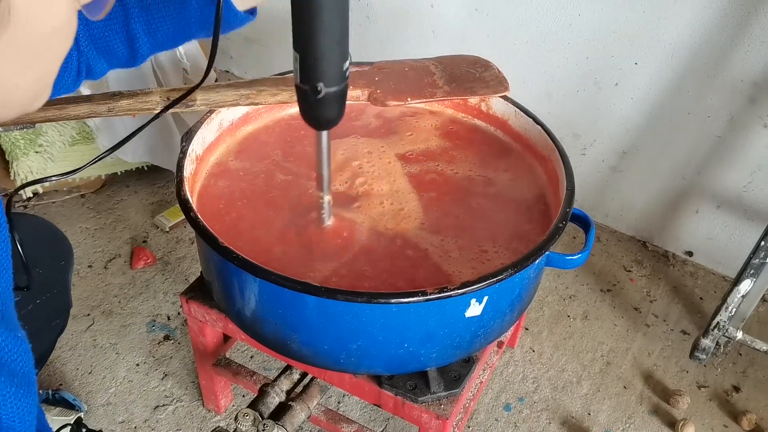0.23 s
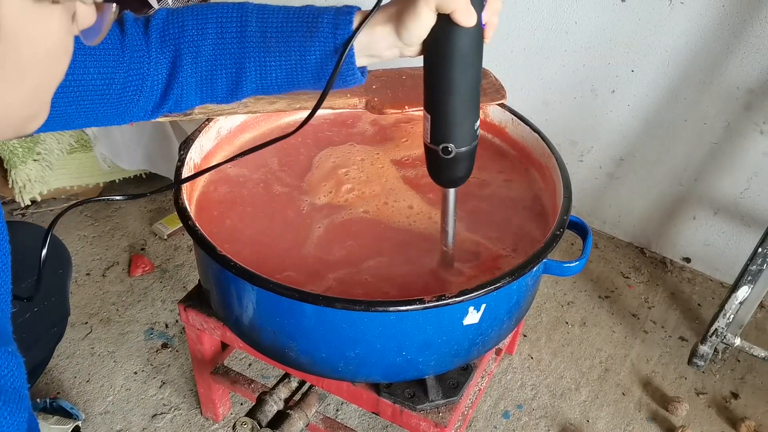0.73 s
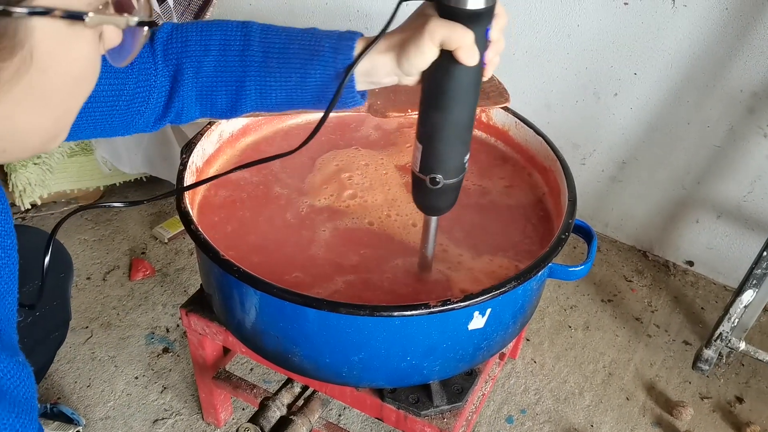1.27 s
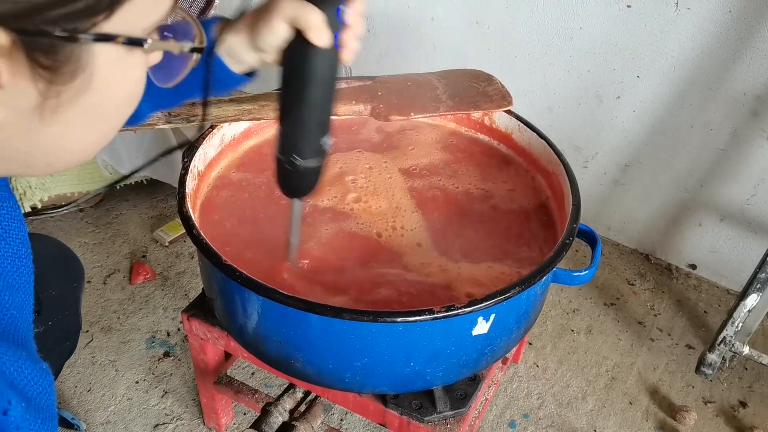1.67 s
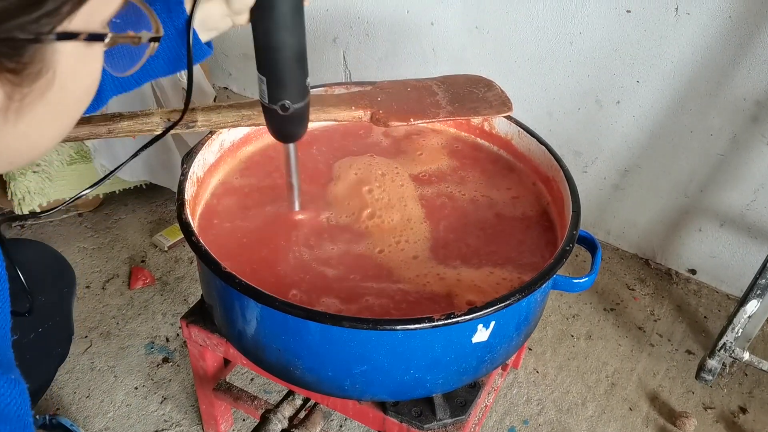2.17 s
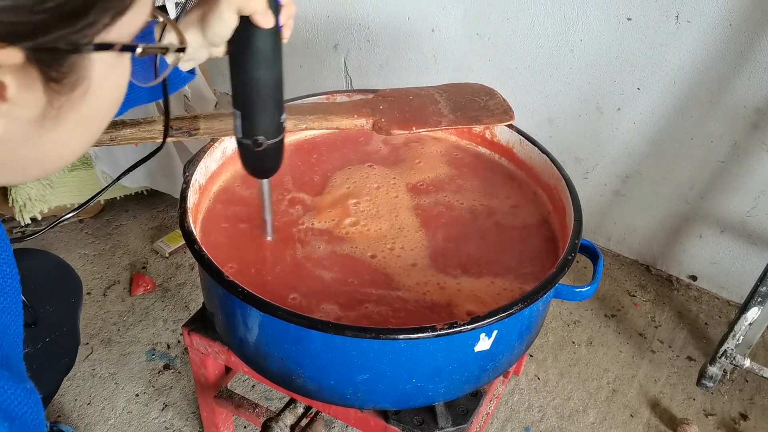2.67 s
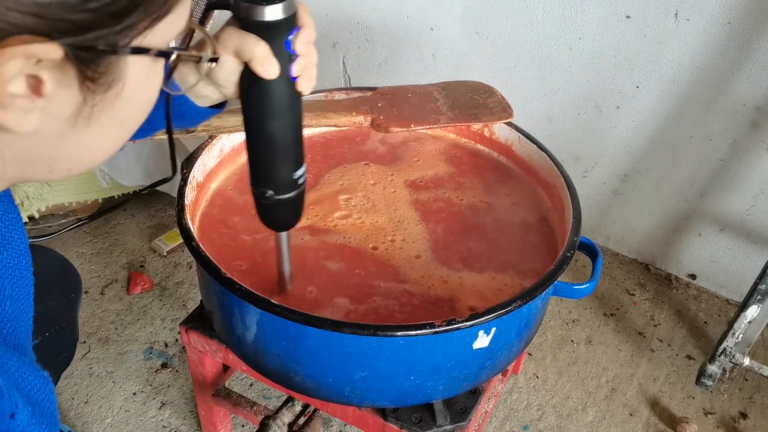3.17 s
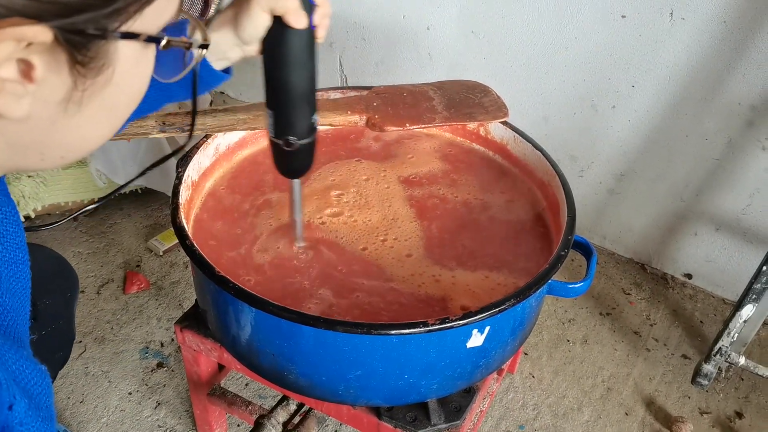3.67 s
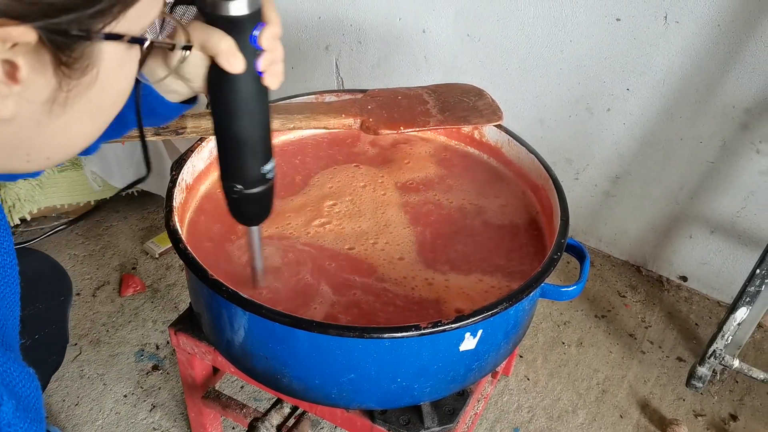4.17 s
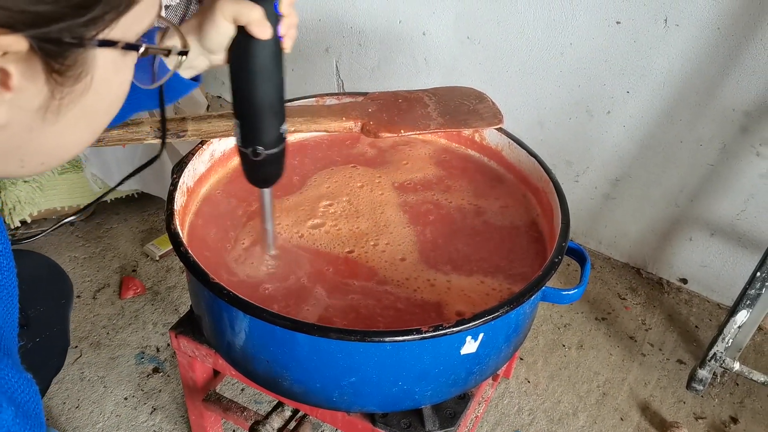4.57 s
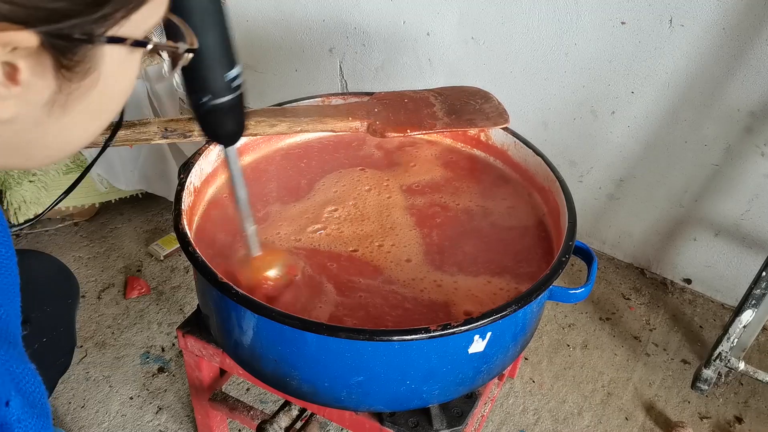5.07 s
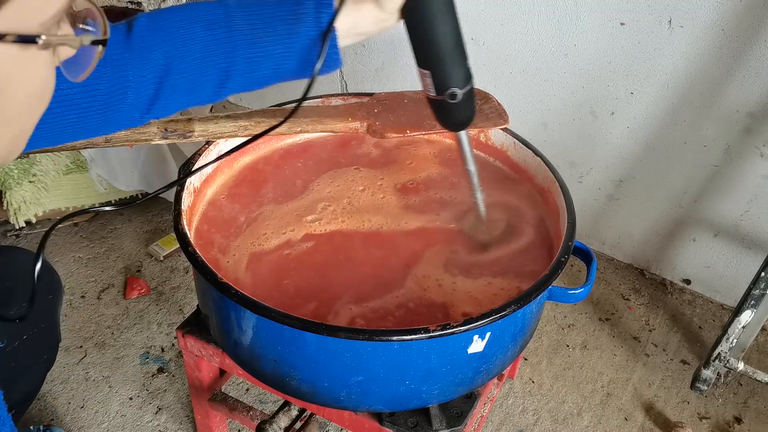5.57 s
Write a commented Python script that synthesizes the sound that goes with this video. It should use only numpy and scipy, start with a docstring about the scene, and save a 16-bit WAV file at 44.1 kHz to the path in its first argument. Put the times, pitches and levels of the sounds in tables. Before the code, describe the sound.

A stick blender purees tomatoes in a big pot in bursts, humming, whining and fizzing, winding down between them.

```python
"""A stick blender winds down, then purees tomatoes in a big enamel pot in three bursts, coasting between.
Its two-winged blade hums in the pulp, then sucks in air and turns to a harsh, fizzing buzz.
The commutator whines, the brushes hiss, the pulp churns and slops, and drops fall off the lifted blade.
A quiet room rumbles behind."""
import sys
import numpy as np
from scipy import signal
from scipy.fft import rfft, irfft, next_fast_len
from scipy.io import wavfile
from scipy.ndimage import uniform_filter1d, map_coordinates

SR = 44100
rng = np.random.default_rng(int(sys.argv[2]) if len(sys.argv) > 2 else 0)


def digitize_waveform(pressure):
    """Quantize a signal to 16-bit integers and store it at the path in sys.argv[1].

    Rows of a 2-D input are taken as channels; values are limited to [-1, 1].
    """
    field = np.atleast_2d(pressure).T
    bounded = np.clip(field, -1, 1)
    quanta = np.round(bounded * 32767).astype(np.int16)
    wavfile.write(sys.argv[1], SR, quanta)


N = 256220
T = np.arange(N) / SR
FFT_SIZE = next_fast_len(N + 8192)
FFT_HZ = np.fft.rfftfreq(FFT_SIZE, 1 / SR)

# Blade's push on the pulp, a list per burst. Each row: time in seconds, tone gain in dB, octave gain in dB.
PULP_PUSH = [
    [(0.69, -17, -43), (0.722, -17, -33), (1.042, -23, -27), (1.088, -32, -24), (1.154, -22, -32),
     (1.2, -27, -26)],
    [(2.11, -21, -23), (2.23, -22, -27), (2.26, -15, -24), (2.38, -12, -16), (2.48, -19, -28),
     (2.63, -23, -15), (2.82, -18, -31), (2.93, -24, -18), (3.02, -21, -20), (3.11, -18, -40),
     (3.16, -19, -25), (3.2, -24, -32), (3.29, -30, -18), (3.4, -33, -29), (3.55, -21, -31),
     (3.65, -35, -27), (3.71, -18, -30), (3.79, -17, -19), (3.97, -20, -28), (4.01, -24, -20),
     (4.14, -23, -30), (4.35, -28, -24), (4.42, -26, -29), (4.62, -16, -18)],
    [(5.69, -47, -47), (5.742, -38, -53), (5.8, -26, -41)],
]
# Air drawn in, a list per vortex. Each row: time in seconds, buzz gain in dB, spray gain in dB.
AIR_INTAKE = [
    [(1.012, -24, -25), (1.036, -25, -19), (1.2, -20, -19)],
    [(2.27, -30, -25), (2.35, -24, -26), (2.46, -21, -22), (2.85, -31, -27), (2.88, -26, -25),
     (3.08, -26, -24), (3.15, -30, -28), (3.3, -26, -21), (3.49, -27, -26), (3.68, -26, -21),
     (3.91, -28, -26), (4.41, -26, -24), (4.48, -28, -21), (4.63, -28, -26)],
]
# Blade overtones. Each row: multiple of the shaft speed, relative level in dB.
BLADE_OVERTONES = [(1, -12.5), (3, -15), (5, -17), (6, 0), (7, -11), (8, -.8), (10, -.4), (12, -6),
                   (14, -8), (16, -4.5), (18, -3.5), (20, -11), (22, -12), (26, -11), (32, -6)]

def blade(angle, speed_hz, pace, power, boom_hz=310, boom_width_hz=28, boom_db=6):
    """Two wings pass per turn: a round hum in the pulp, a stack of overtones once they beat on air."""
    slip = 3.2 * power  # during run-up the blade has not yet gripped the pulp
    tone, octave = amp(burst_curves_db(PULP_PUSH)) * pace ** (5.2 + slip)
    funnel = vortex(rise_s=.03)
    buzz = amp(burst_curves_db(AIR_INTAKE)[0]) * funnel * pace ** 6.8
    pot_resonance = amp(boom_db / (1 + ((2 * speed_hz - boom_hz) / boom_width_hz) ** 2))
    # the vortex sways, gulps while it opens, and breaks up at power-off
    sway_rad = .055
    gulp_rad = .2 * np.sin(np.pi * vortex(rise_s=.035))
    breakup_rad = .8 * (1 - uniform_filter1d(power, size=2000))
    angle = angle + (sway_rad + gulp_rad + breakup_rad) * wobble(70)
    tone_wave = partial(angle, order=2, rough=.12, drift_rad=.26, swell_db=1.9, drift_hz=40)
    octave_wave = partial(angle, order=4, rough=.12, drift_rad=.25, swell_db=2.1, drift_hz=28)
    hum = amp(.4) * pot_resonance * tone * tone_wave + amp(1.3) * octave * pace ** 2 * octave_wave
    # a hard push on aerated pulp steepens the wave
    steepening = amp(-24) * tone + amp(-4) * funnel * tone ** 2
    for order, db in BLADE_OVERTONES:
        muffled = steepening / (1 + (order / 8) ** 4)
        level = amp(db) * (amp(-5) * buzz + muffled)
        offset = rng.uniform(0, 2 * np.pi)
        hum += level * partial(angle + offset, order, rough=.23, drift_rad=min(.07 * order, .8), swell_db=2.3)
    return hum


# Bubble fizz. Each row: frequency in Hz, relative density in dB.
SPRAY_SPECTRUM = [(600, -20), (1400, -4), (2500, -4), (3100, -7), (4200, -3), (5000, -8), (6200, -4),
                  (7700, 2), (8900, -13), (10100, -3), (13000, -7), (15000, -11), (16000, -20)]

def spray(angle, air, throb=.18, grain_db=3, flutter_db=.8, surge_db=.7):
    """Tiny bubbles collapse behind each wing in a dense fizz."""
    hiss = noise()
    grains = np.repeat(rng.standard_normal(N // 8 + 1), 8)[:N]
    bubbles = hiss * unit(amp(grain_db * grains))
    wing_beat = 1 + throb * np.cos(2 * angle)
    flutter = amp(flutter_db * wobble(90) + surge_db * wobble(14))
    return amp(.9) * air * spread(bubbles * wing_beat * flutter, SPRAY_SPECTRUM)


# Trigger pulls. Each row: press and release in seconds, nominal shaft speed in Hz,
# then slosh, gurgle, motor and bearing gains in dB.
TRIGGER_BURSTS = [(-1, -.235, 224, -48, -44, -1, -44), (.594, 1.195, 224.5, -44, -31.5, 0, -45),
                  (2.011, 4.635, 223.8, -47.5, -32.5, 0, -45), (5.594, 6, 236, -42, -41, -2.5, -37)]
RELIEF_S = .16  # time constant of the air funnel unloading the blade

def shaft(spin_up_s=.029, coast_s=.272, friction=.052, inertia_s=.12, relief_hz=11, sag_hz_per_db=.13):
    """A quick run-up, then drag and friction stop the rotor. Returns Hz, pace (0 to 1), power (0 or 1)."""
    # a push above the usual -21 dB slows the shaft; air at the blade speeds it up
    push_db = np.clip(burst_curves_db(PULP_PUSH)[0], -45, 0)
    sag_hz = sag_hz_per_db * uniform_filter1d(push_db + 21, int(inertia_s * SR))
    shift_hz = relief_hz * vortex(RELIEF_S) - sag_hz
    speed_hz, pace, power = np.zeros((3, N))
    for on, off, hz, *_ in TRIGGER_BURSTS:
        run_up = 1 - np.exp(-since(on) / spin_up_s)
        drag = np.exp(-since(off) / coast_s)
        share = run_up * np.maximum(drag - (1 - drag) * friction, 0)
        speed_hz += share * (hz + shift_hz)
        pace += share
        power += (T > on) & (T < off)
    hunting = 1 + .0016 * wobble(40)
    return speed_hz * hunting, pace, power


# Motor housing resonances. Each row: frequency in Hz, gain in dB.
HOUSING_RESPONSE = [(1500, -30), (3000, -24), (4200, -4), (5400, -7), (6500, -3), (7600, 2), (8900, -15),
                    (10200, 0), (11500, -1), (12800, -14), (16000, -20)]

def commutator(angle, pace, power, air, ripple, segments=24, driven_db=-35.5, coasting_db=-33.5):
    """Segments tick past the brushes; their overtones slide through the housing's resonances."""
    jolts = (.5 + 30 * air) * power * wobble(350)  # a blade beating on air smears the whine
    segment_angle = segments * angle + .4 * ripple + jolts
    whine = 0
    for order in range(1, 8):
        # order 2 dominates under power; coasting bares the others
        weight = 1 if order == 2 else (1 - .65 * power) * min(.7, (2.1 / order) ** 1.1)
        whine += weight * partial(segment_angle, order, rough=.5, drift_rad=.6, swell_db=1)
    level = power * amp(driven_db) * (1 + .45 * ripple) + (1 - power) * amp(coasting_db)
    return coloured(whine * level * pace ** 2.2, HOUSING_RESPONSE)


def bearing(angle, pace):
    """The shaft bearing whirrs, most openly when the wand is barely dipped."""
    low = partial(angle, order=7, rough=.45, drift_rad=.4)
    high = partial(angle, order=24, rough=1.1, drift_rad=.6, eddy_hz=400)
    return amp(burst_gains_db()[3]) * pace ** 4 * (low + amp(-7) * high)


# Brush hiss. Each row: frequency in Hz, relative density in dB.
BRUSH_SPECTRUM = [(500, -14), (1100, 0), (1700, 6), (2350, 3), (2900, -9), (4200, -4), (5400, -4.5),
                  (7600, 2.5), (8900, -15), (10200, -4), (11200, -5), (12500, -11.5), (16000, -20)]

def brushes(pace, power, ripple, hiss_db=-39, spark_db=-49, rub_db=-35):
    """The brushes hiss and spark under power, and only rub while coasting."""
    driven = power * (amp(hiss_db) * pace ** 2 + amp(spark_db)) * (1 + .17 * ripple)
    coasting = (1 - power) * amp(rub_db) * pace ** 2.05
    return (driven + coasting) * spread(noise(), BRUSH_SPECTRUM)


# Heaving pulp, ringing pot, parted pulp. Each row: frequency in Hz, relative density in dB.
SLOSH_SPECTRUM = [(30, -28), (75, -2), (100, 0), (170, -1), (230, 5.5), (310, -3), (500, -14), (1500, -40)]
POT_SPECTRUM = [(100, -25), (250, -5), (330, 0), (420, 3), (500, -4), (580, -10), (670, -2), (800, -1),
                (1050, 1.5), (1300, -1.5), (1650, -3.5), (2200, -8.5), (3200, -22), (8000, -50)]
SWISH_SPECTRUM = [(40, -12), (110, 0), (240, 5), (380, -8), (650, -4), (1050, 0), (1600, -1), (2300, -5),
                  (3200, -14), (4200, -14), (5400, -24), (7400, -21), (9000, -42), (15000, -48)]
# Idle wand dragged through the pulp. Each row: middle in seconds, half length in seconds, gain in dB.
WAND_DRAGS = [(1.83, .24, -51), (5.08, .13, -53)]

def churn(pace, lag_s=.07, stir_db=1.5, funnel_db=-1, settle_db=-53.5, settle_db_per_s=13):
    """Pulp heaves and gurgles in lumps: stirred by the blade, swirling on, parted by the wand."""
    pole = np.exp(-1 / (lag_s * SR))
    flow = signal.lfilter([1 - pole], [1, -pole], pace ** 3.4)
    slosh, gurgle = amp(burst_gains_db()[:2] + stir_db + funnel_db * vortex(RELIEF_S)) * flow
    settling = sum((T > off) * amp(settle_db - settle_db_per_s * since(off))
                   for _, off, *_ in TRIGGER_BURSTS)
    swish = sum(amp(db) * bump(middle_s, half_s) for middle_s, half_s, db in WAND_DRAGS)
    lumps = amp(2.3 * wobble(45))
    layers = [(np.hypot(slosh, settling), SLOSH_SPECTRUM),
              (np.hypot(gurgle, amp(-5) * settling), POT_SPECTRUM),
              (swish, SWISH_SPECTRUM)]
    return sum(level * spread(noise() * lumps, spectrum) for level, spectrum in layers)


# Slops of pulp. Each row: start in seconds, thud gain in dB, splash gain in dB.
PULP_SLOPS = [(0.972, -24.5, -21), (2.264, -20, -23.5), (5.088, -43, -62), (5.139, -49, -60),
              (5.203, -58, -47), (5.633, -36, -44)]

def slops(attack_s=.002, t60_s=.22):
    """Pulp slaps the blade guard: a low thud and a short splash."""
    thud, splash = np.zeros((2, N))
    for start_s, thud_db, splash_db in PULP_SLOPS:
        age_s = since(start_s)
        envelope = (1 - np.exp(-age_s / attack_s)) * amp(-60 * age_s / t60_s)
        thud += amp(thud_db) * envelope
        splash += amp(splash_db) * envelope
    thud_spectrum = [(40, -18), (110, -4), (240, 3), (400, -1), (700, -10), (2500, -21), (8000, -60)]
    splash_spectrum = [(1500, -20), (3500, 0), (7500, 0), (15000, -10)]
    return thud * spread(noise(), thud_spectrum) + splash * spread(noise(), splash_spectrum)


# Drops off the lifted blade. Each row: start in seconds, relative level in dB.
BLADE_DROPS = [(5.1213, -46), (5.1454, -47), (5.2041, -31), (5.2164, -36), (5.243, -36)]

def drops(tick_t60_s=.012, tail_t60_s=.25, tail_db=-13):
    """Each drop ticks on the surface and the walls answer briefly."""
    level = np.zeros(N)
    for start_s, db in BLADE_DROPS:
        tick = amp(-60 * since(start_s) / tick_t60_s)
        tail = amp(tail_db - 60 * since(start_s) / tail_t60_s)
        level += (T > start_s) * amp(db) * (tick + tail)
    spectrum = [(1500, -20), (3800, 1), (5500, -4), (7300, 0), (9000, -12), (10500, -9), (15000, -18)]
    return amp(-9) * level * spread(noise(), spectrum)


# Room background. Each row: frequency in Hz, relative density in dB.
ROOM_SPECTRUM = [(25, -19), (60, -4), (100, 0), (150, -7), (230, -3), (380, -14), (780, -12), (1050, -5.5),
                 (1600, -10), (2400, -20), (3200, -31), (5200, -44), (7400, -42), (9000, -54), (15000, -52)]

def room(air_db=-56, rumble_db=-63, swell_db=14):
    """A steady background with a narrow low rumble that swells once."""
    rumble = spread(noise(), [(25, -34), (44, -16), (53, 0), (62, -14), (100, -45), (300, -100)])
    rumble_level = amp(rumble_db + swell_db * bump(middle_s=2.95, half_s=.9))
    return amp(air_db) * spread(noise(), ROOM_SPECTRUM) + rumble_level * rumble


def vortex(rise_s):
    """How far the air funnel has opened, 0 to 1; reset at the next press."""
    opening = np.zeros(N)
    for rows in AIR_INTAKE:
        open_s = rows[0][0]
        close_s = min(on for on, *_ in TRIGGER_BURSTS if on > open_s)
        opening += (1 - np.exp(-since(open_s) / rise_s)) * (T < close_s)
    return opening


def partial(angle, order, rough, drift_rad, swell_db=0, eddy_hz=150, drift_hz=11):
    """One multiple of a rotation: eddies roughen it, moving pulp shifts its path to each ear."""
    phase = order * angle + rough * wobble(eddy_hz)
    size = (1 + rough * wobble(eddy_hz)) * amp(swell_db * wobble(drift_hz))
    ear_shift = drift_rad * wobble(drift_hz) * np.array([[1], [-1]])
    return np.sqrt(2) * unit(size) * np.cos(phase + ear_shift)


def burst_curves_db(table):
    """Two dB curves; each list holds from its burst's press until the next takes over."""
    curves = np.full((2, N), -120.)
    for rows in table:
        times_s, *columns = np.transpose(rows)
        press_s = max(on for on, *_ in TRIGGER_BURSTS if on < times_s[0])
        curves = np.where(T >= press_s, [np.interp(T, times_s, db) for db in columns], curves)
    return curves


def burst_gains_db():
    """Slosh, gurgle, motor and bearing gains of the latest burst."""
    gains = np.zeros((4, N))
    for on, _, _, *dbs in TRIGGER_BURSTS:
        gains[:, T > on] = np.array(dbs)[:, None]
    return gains


# Stereo field. Each row: frequency in Hz, left-right correlation.
STEREO_CORRELATION = [(100, .85), (450, .8), (1000, .45), (2000, .1), (4000, .03), (12000, 0)]

def spread(pair, spectrum):
    """Two unrelated signals become a coloured stereo field whose middle has rms 1."""
    width = np.tan(np.arccos(np.clip(per_bin(STEREO_CORRELATION), -1, 1)) / 2)
    shaped = rfft(pair, FFT_SIZE) * amp(per_bin(spectrum))
    mid, side = irfft(shaped * [np.ones_like(width), width], FFT_SIZE)[:, :N]
    return np.array([mid + side, mid - side]) / mid.std()


def coloured(x, spectrum):
    """x shaped by (Hz, dB) points."""
    return irfft(rfft(x, FFT_SIZE) * amp(per_bin(spectrum)), FFT_SIZE)[..., :N]


def per_bin(points):
    """(Hz, value) points interpolated to the FFT bins on a log axis."""
    hz, values = np.transpose(points)
    return np.interp(np.log(FFT_HZ + 1), np.log(hz + 1), values)


def wobble(rate_hz):
    """A smooth random curve, rate_hz knots a second."""
    knots = rng.standard_normal(int(N * rate_hz / SR) + 4)
    return np.interp(T, T[::16], map_coordinates(knots, [T[::16] * rate_hz]))


def noise():
    """Two unrelated white noises."""
    return rng.standard_normal((2, N))


def since(start_s):
    """Seconds since start_s, zero before it."""
    return np.maximum(T - start_s, 0)


def bump(middle_s, half_s):
    """A smooth rise and fall of height 1."""
    return np.exp(-((T - middle_s) / half_s) ** 2)


def amp(db):
    """Decibels to gain."""
    return 10 ** (np.asarray(db) / 20)


def unit(x):
    """Scale to rms 1."""
    return x / np.sqrt(np.mean(np.abs(x) ** 2) + 1e-20)


def scene(mains_hz=50):
    """One shaft drives blade, spray, motor noise and churning; slops, drops and room join them."""
    speed_hz, pace, power = shaft()
    angle = 2 * np.pi * np.cumsum(speed_hz) / SR
    air = amp(burst_curves_db(AIR_INTAKE)[1]) * vortex(rise_s=.008) * pace ** 5.7
    ripple = power * np.cos(2 * np.pi * 2 * mains_hz * T)  # torque pulses twice per mains cycle
    blender = blade(angle, speed_hz, pace, power) + spray(angle, air)
    whine = commutator(angle, pace, power, air, ripple)
    motor = amp(burst_gains_db()[2]) * (whine + bearing(angle, pace) + brushes(pace, power, ripple))
    return blender + motor + churn(pace) + slops() + drops() + room()


# Microphone balance. Each row: frequency in Hz, left minus right in dB.
MIC_BALANCE = [(50, 8), (150, 7), (250, -5), (470, 2.6), (2000, -.8), (6200, -1.5), (7700, 5.5), (13000, 3)]

def record(dry, lead_s=.00012, ceiling=.92, top_hz=15900):
    """Two microphones differ in colour, the left is nearer; peaks are rounded, then the top is cut."""
    left = amp(per_bin(MIC_BALANCE) / 2) * np.exp(1j * np.pi * FFT_HZ * lead_s)
    heard = irfft(rfft(dry, FFT_SIZE) * np.array([left, 1 / left]), FFT_SIZE)
    limited = heard / (1 + np.abs(heard / ceiling) ** 8) ** (1 / 8)
    return irfft(rfft(limited) * (FFT_HZ < top_hz), FFT_SIZE)[:, :N]


dry = scene()
out = record(dry)
digitize_waveform(out)
```